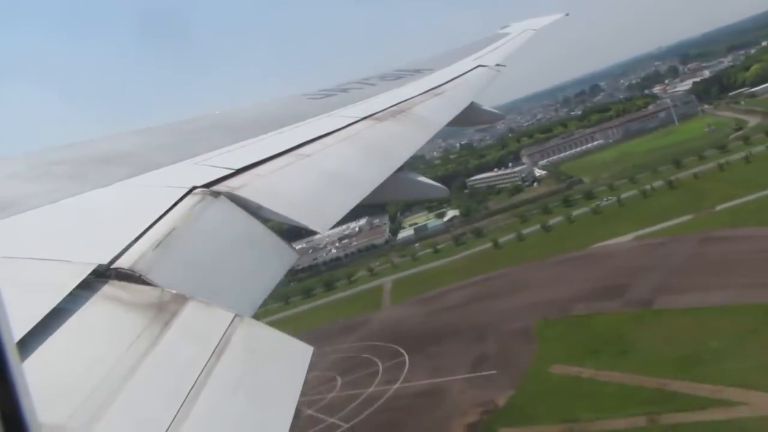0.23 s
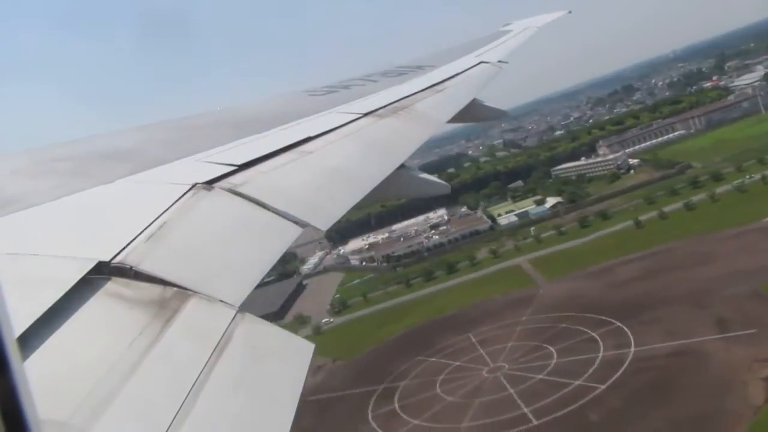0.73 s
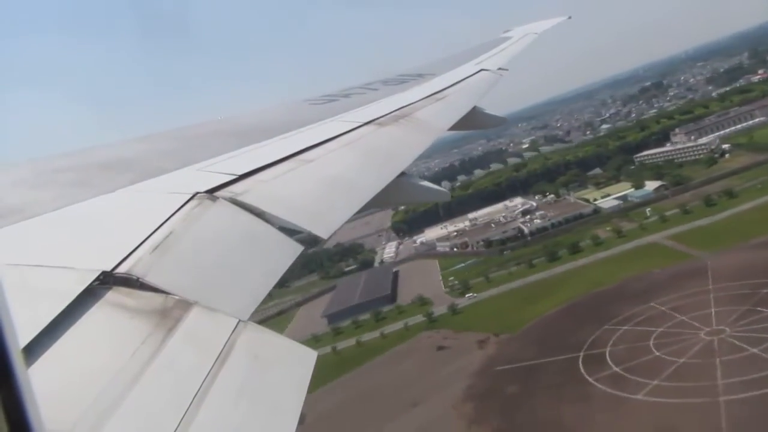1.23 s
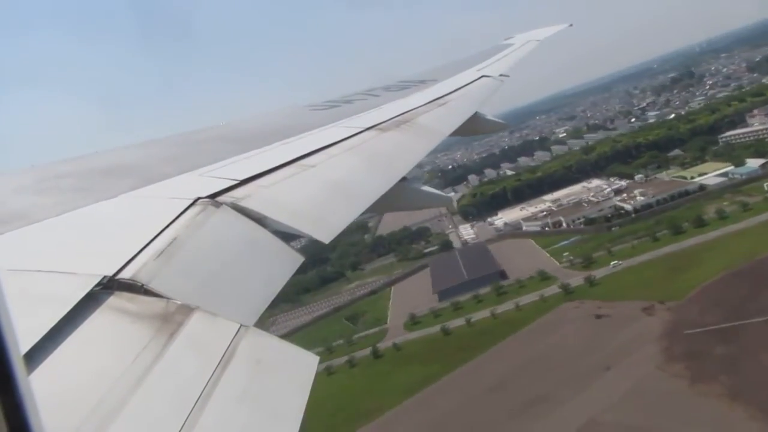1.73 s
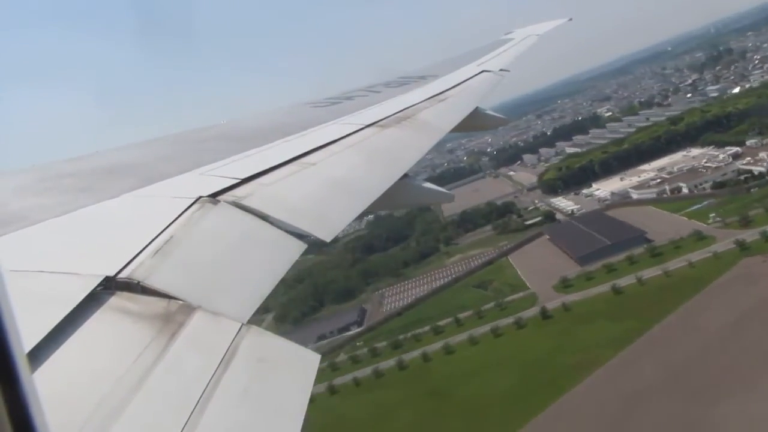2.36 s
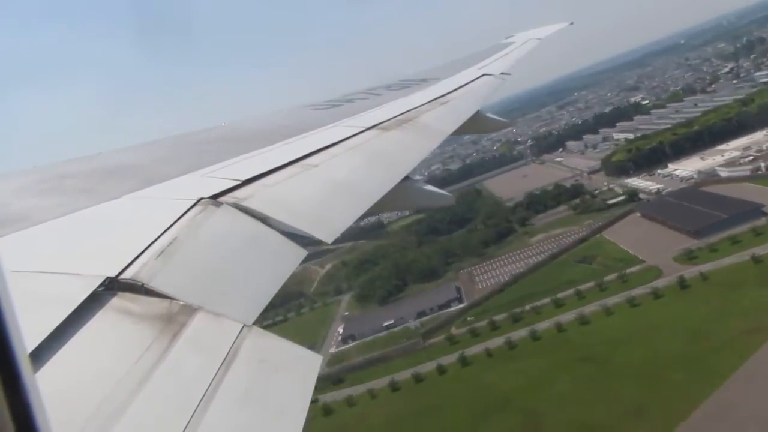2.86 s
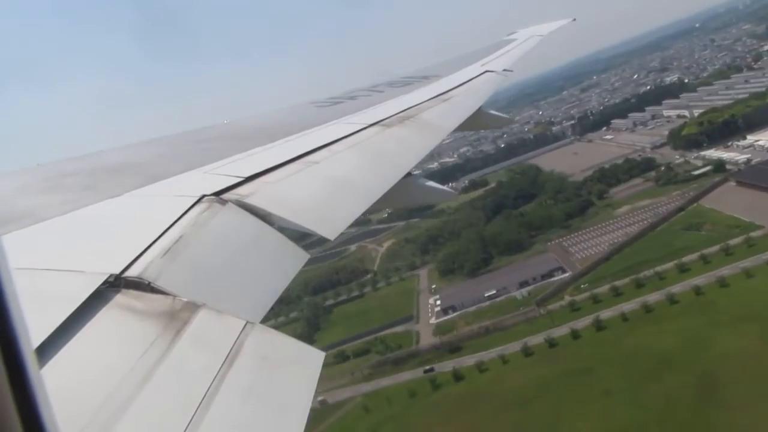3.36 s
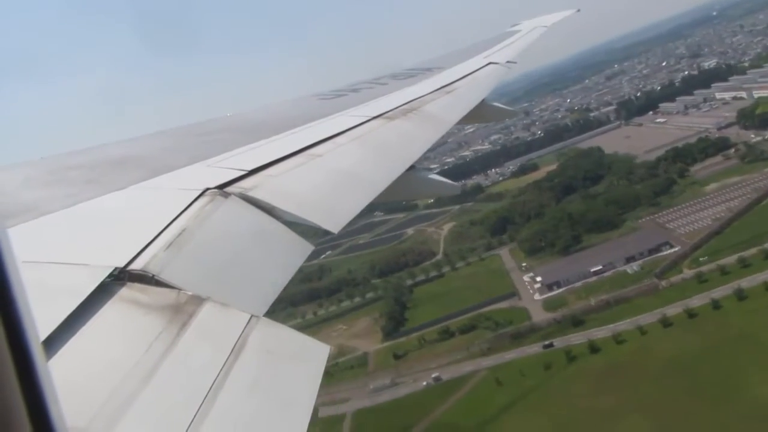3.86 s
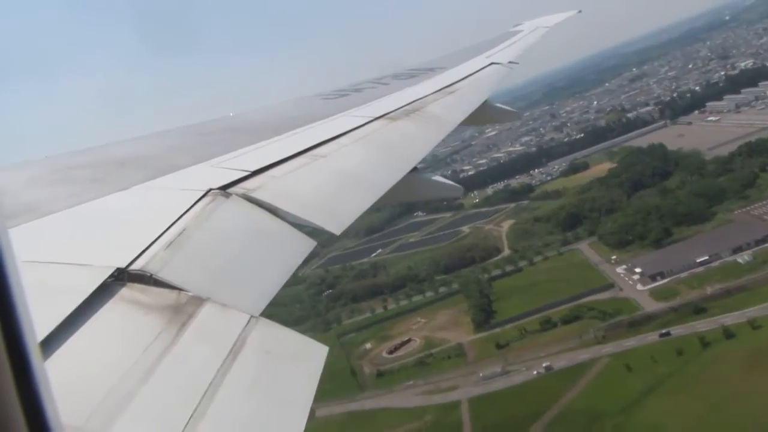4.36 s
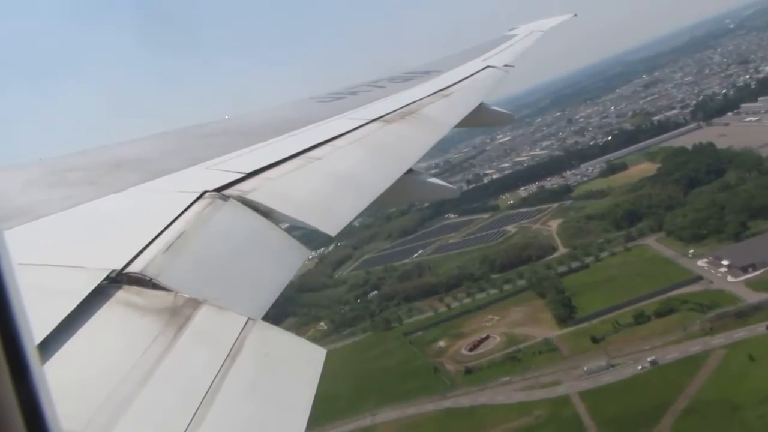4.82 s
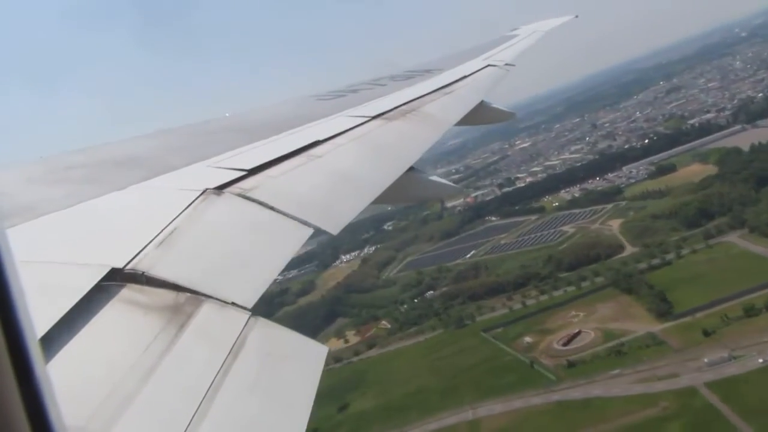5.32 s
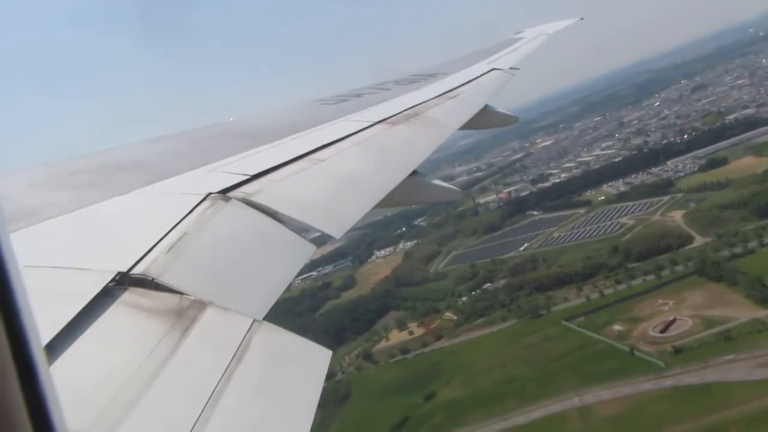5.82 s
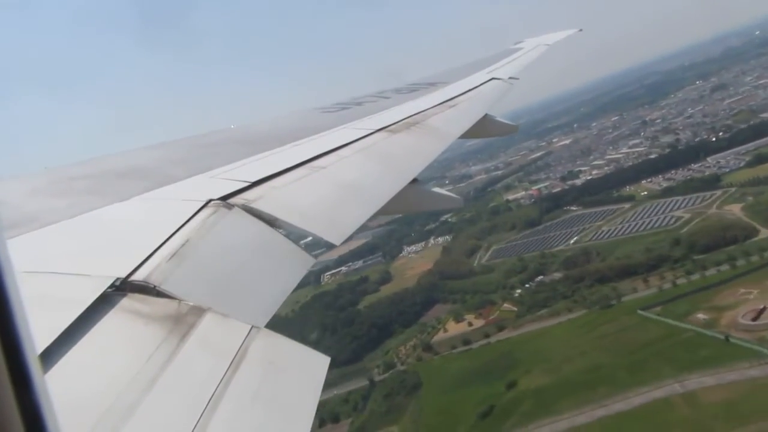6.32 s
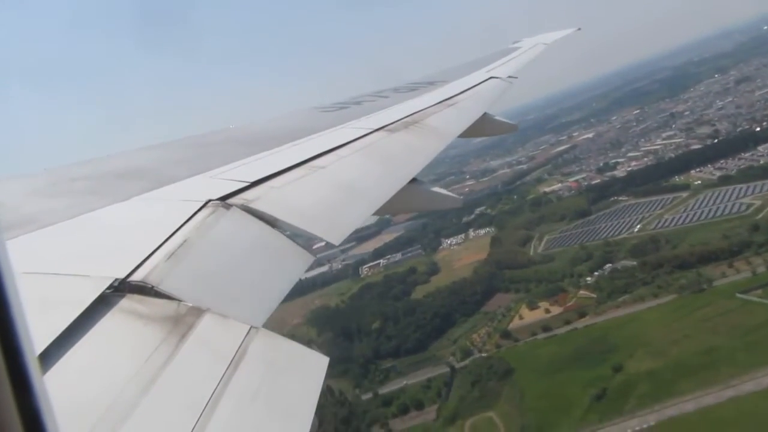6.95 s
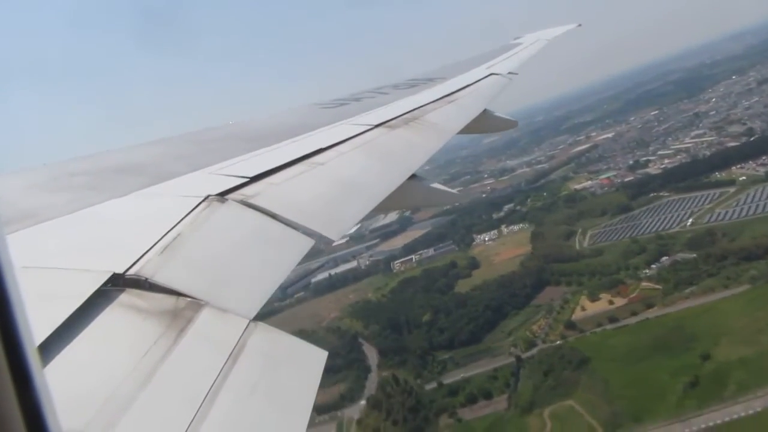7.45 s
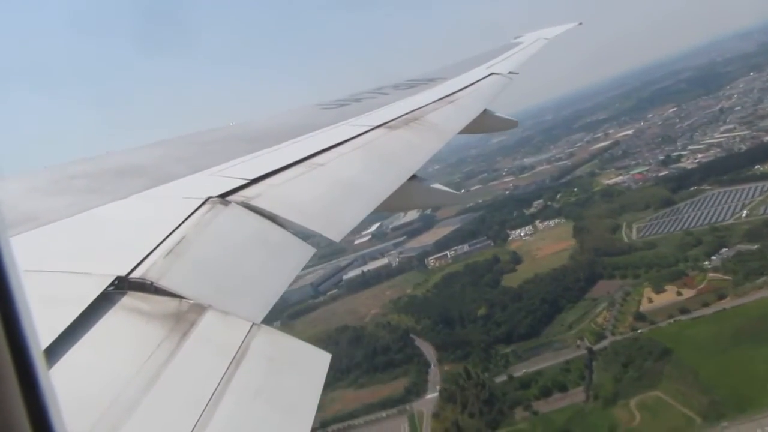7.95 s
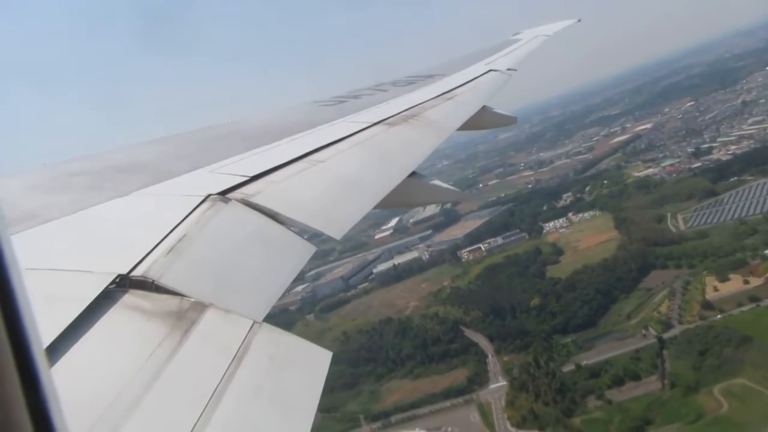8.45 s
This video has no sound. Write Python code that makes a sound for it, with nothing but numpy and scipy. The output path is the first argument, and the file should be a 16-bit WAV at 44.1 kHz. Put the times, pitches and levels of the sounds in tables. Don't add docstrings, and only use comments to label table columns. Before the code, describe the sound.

A continuous deep jet roar comes through the cabin wall, boomy and dull, with a weak mid-pitched engine tone drifting above it and soft vent hiss. Nearby, brittle plastic chatter bursts out again and again, rapid dry clicks in short flurries with lone ticks between, thinning later. Recorded very close to the window panel, in stereo, top end slightly dulled, with no fade or ending.

```python
import sys
import numpy as np
from scipy import signal
from scipy.fft import rfft, irfft
from scipy.io import wavfile

SR = 44100
rng = np.random.default_rng(int(sys.argv[2]) if len(sys.argv) > 2 else 0)


def put_to_file(sound):
    columns = np.atleast_2d(sound).T
    safe = np.clip(columns, -1, 1)
    whole_steps = np.round(safe * 32767)
    wavfile.write(sys.argv[1], SR, whole_steps.astype(np.int16))


def undo_db(level):
    steps = np.asarray(level, float) / 20
    return 10 ** steps


N = 382788
HZ = np.fft.rfftfreq(N, 1 / SR)

# f/Hz, density/dB per Hz
RUMBLE_SPECTRUM = [(20, -38.5), (40, -24), (58, -10.5), (70, -10), (85, -3.5), (100, 0.5), (118, -0.5),
                   (135, -3.5), (185, -2), (260, -15), (345, -17), (430, -29.5), (550, -48.5), (920, -120)]
ROAR_SPECTRUM = [(140, -26.5), (240, -2), (345, -5.5), (456, -13), (596, -18), (762, -21), (836, -22),
                 (897, -20.5), (962, -25.5), (1070, -27), (1210, -27), (2200, -39), (2530, -40),
                 (3900, -61.5), (5070, -91), (8580, -120)]
VENT_SPECTRUM = [(3000, -30), (3800, -11), (4300, -4), (4950, 1), (5400, -.5), (6600, 1.5), (7600, -1.5),
                 (9200, -5), (10100, -11), (12000, -15), (13500, -18), (14300, -18), (15200, -22),
                 (16000, -30)]
# f/Hz, width/Hz, lift/dB
WALL_MODES = [(757, 70, 6), (1050, 99, 6), (2080, 25, 0), (2320, 55, -1.5), (2500, 44, 2), (3035, 37, 7)]
# f/Hz, left minus right/dB
STEREO_LEAN = [(25, 1.5), (60, 0), (100, -1), (180, -2.5), (320, -2.1), (550, -1), (960, -.5), (1680, 0),
               (2920, -1.3), (5090, -.3), (8870, 0)]
# f/Hz, likeness/0-1, left lead/rad
PORTS = [(25, .99, .3), (60, .985, .25), (125, .97, .15), (250, .94, .1), (500, .86, .15), (800, .8, .2),
         (1300, .72, .9), (2070, .72, -.2), (2600, .75, .3), (3700, .85, 0), (4500, .3, .5), (9000, .1, 0)]
# f/Hz, width/Hz, level/dB rms, left minus right/dB
FAN_TONES = [(911, 3.5, -54, 0), (1710, 8, -71, 0), (1822, 6, -73, 0), (2504, 18, -72, 0),
             (2537, 14, -73, 0)]
# t/s, f/Hz, level/dB rms
SHAFT_TONE = [(0, 638.5, -50.5), (.75, 646, -44), (1.25, 642, -51), (1.7, 641, -49), (2.2, 635.5, -59),
              (2.9, 638, -49.5), (3.7, 651.6, -55.5), (4.5, 650, -52), (5.6, 647, -53), (6.4, 648, -46),
              (6.9, 642, -54), (8, 646, -47), (8.68, 654, -50)]
# t/s, roar level/dB
LOUDNESS = [(0.0, -32), (1.04, -31), (1.21, -28.5), (1.91, -29), (2.0, -30.5), (2.84, -26.5), (3.3, -28.5),
            (4.27, -28.5), (4.77, -29), (5.14, -28.5), (5.16, -31.5), (6.0, -29.5), (6.8, -29), (6.82, -31),
            (7.07, -30), (8.66, -28.5)]
# t/s, change/dB, length/s
BUFFETS = [(.2, -1, 0.028), (0.547, 0, 0.052), (0.744, -0.5, 0.013), (1.337, 0.5, 0.043),
           (1.53, 2.5, 0.032), (2.092, 10, 0.01), (2.146, -6, 0.025), (3.67, -4.5, 0.023),
           (4.554, 1.5, 0.25), (4.596, -12, 0.016), (5.055, 2, 0.38), (5.503, -3.5, 0.052),
           (5.682, -3.5, 0.037), (6.397, 1.5, 0.069), (7.66, -10.5, 0.032), (8.094, 0, 0.16),
           (8.473, 3, .04)]
# t/s, change/dB, length/s
KNOCKS = [
    (1.232, 2.5, 0.01),
    (3.098, -3.5, 0.005),
    (4.89, 2.5, 0.013),
    (6.26, 2, 0.0086),
]
# f/Hz, t60/s, left level/dB, right level/dB
PART_MODES = [(2070, 0.036, -25.5, -25), (2444, 0.04, -25.5, -23), (2596, 0.012, -17.5, -19),
              (2850, 0.038, -28, -23.5), (4350, 0.0032, -8, -10.5), (5130, 0.0028, -6, -7),
              (6240, .002, -7, -12), (6440, 0.0035, -13.5, -14.5), (7200, 0.002, 6, -5),
              (7990, 0.0026, 2, -11.5), (8900, 0.0017, -12.5, -5.5), (10200, 0.0013, -10.5, -17),
              (11100, 0.002, -11.5, -19), (12100, 0.00092, -9, -19.5), (14000, .0015, -17, -16)]
# t of hardest blow/s, peak/dB, swings before, swings after
RUNS = [(0.6987, -27, 0, 4), (0.7962, -28, 4, 1), (1.0356, -31, 2, 6), (1.2035, -31, 0, 8),
        (1.5337, -24, 2, 3), (1.6003, -30, 0, 4), (1.7568, -24, 3, 2), (1.9256, -28, 0, 5),
        (2.0021, -27, 0, 6), (2.4567, -25, 9, 12), (2.6399, -29, 3, 4), (2.9224, -28, 5, 2),
        (3.2926, -27, 7, 4), (3.5217, -28, 0, 4), (3.6165, -33, 4, 0), (3.7076, -27, 0, 10),
        (3.8849, -30, 5, 0), (4.0948, -32, 4, 0), (4.1469, -27, 2, 6), (4.3837, -33, 0, 4),
        (4.4719, -30, 0, 10), (4.9183, -31, 7, 0), (5.0038, -32, 6, 0), (5.1612, -28, 4, 1),
        (5.4056, -28, 0, 6), (5.5134, -35, 2, 3), (5.6395, -29, 7, 1), (5.7693, -28, 2, 3),
        (6.8408, -32, 3, 4), (7.108, -30, 6, 6)]
BURSTS = [(0.0446, -30, 0, 1), (0.603, -27, 2, 0), (1.3583, -27, 1, 0), (1.4668, -31, 1, 1),
          (1.6768, -28, 0, 3), (2.0892, -28, 1, 1), (2.8152, -28, 0, 3), (3.4608, -28, 2, 0),
          (4.2437, -26, 1, 0), (4.2718, -27, 0, 0), (4.8156, -27, 1, 2), (5.0349, -28, 0, 2),
          (5.3587, -27, 0, 1), (5.8696, -26, 2, 2), (6.0851, -28, 2, 1), (6.1477, -28, 2, 1),
          (6.408, -27, 0, 0), (6.4357, -31, 0, 4), (6.6965, -28, 0, 0), (6.9915, -29, 3, 0),
          (7.5571, -30, 2, 0), (7.7167, -26, 1, 1), (7.9305, -28, 0, 4), (8.0191, -27, 0, 1),
          (8.086, -26, 1, 0), (8.3319, -31, 3, 0), (8.3763, -31, 2, 0), (8.4597, -26, 1, 2),
          (8.5861, -25, 0, 1), (8.6468, -28, 2, 0)]
# t/s, peak/dB
LONE_BLOWS = [(.0027, -34), (.3049, -33), (.3518, -35), (.4552, -35), (.5488, -33), (.6654, -34),
              (.8969, -35), (.9396, -34), (.9832, -37), (1.1734, -33), (1.3947, -34), (1.8419, -33),
              (1.8952, -35), (2.3001, -30), (2.3502, -33), (2.7752, -31), (3.1253, -35), (3.3644, -32),
              (3.9804, -32), (4.6366, -32), (5.2462, -35), (5.9477, -33), (6.2058, -31), (6.5509, -35),
              (6.7866, -31), (7.255, -32), (7.4745, -32), (8.12, -30), (8.417, -32), (8.5398, -31)]
HARD_BLOWS = [(1.5487, -29), (1.5646, -27), (1.7305, -30), (1.7396, -25), (1.7478, -29), (1.7647, -29),
              (2.0988, -31), (2.4654, -31), (2.4844, -30), (2.5026, -31), (2.5366, -26), (2.5453, -26),
              (2.8331, -28), (2.8418, -30), (2.8961, -30), (2.9316, -28), (3.2277, -30), (3.2633, -31),
              (3.3199, -31), (3.7581, -30), (3.8491, -30), (4.1298, -27), (4.1665, -28), (4.2004, -30),
              (5.4248, -30), (5.6486, -30), (5.7499, -29), (5.8508, -29), (6.139, -30), (8.0761, -27)]

RUMBLE_DB, ROAR_DB = 14.5, 2
VENT_DB, VENT_FOLLOW = -62, 1
SHAFT_DRIFT_HZ, SHAFT_FADE_DB, WANDER_HZ = 1.2, 1.2, 1.6
PANEL_HZ, PANEL_LEAD_S, PANEL_SPAN_S = 112, .0002, .011
PANEL_DB, PANEL_SLOPE = -22.5, 0.48
HIT_SHARE, SWING_JITTER = .72, .09
LIGHT_DB = (-41, -31)
STRAYS, STRAY_DB = 26, (-42, -36)
TICK_DB, CONTACT_S, RIGHT_LAG_S = -7.5, .00005, .00005
REBOUND_S, REBOUND_DB, REBOUND_DULL_HZ = .000385, 1.0, 8500
VARY_DB, VARY_HZ_SHARE, VARY_REBOUND_S = 1.4, .01, .000015
HARD_TILT = .12
SCATTER_DB, SCATTER_T60_S, SCATTER_LAG_S = (-21.5, -15), .02, 0.00054
FRESH_SHARE = 1.0
MIC_TOP_HZ = 14200


def on_hz(table):
    f, v = np.transpose(table)
    return np.interp(np.log(HZ + 1), np.log(f + 1), v)


def curve(table):
    s, *columns = np.transpose(table)
    return [np.interp(np.arange(N) / SR, s, c) for c in columns]


def bumps(table):
    t = np.arange(N) / SR
    return sum(db * np.exp(-((t - s) / length) ** 2) for s, db, length in table)


def walk(rate_hz):
    slow = irfft(rfft(rng.standard_normal(N)) * np.exp(-(HZ / rate_hz) ** 2), N)
    return (slow - slow.mean()) / slow.std()


def level(x, db):
    return x * undo_db(db) / np.sqrt(np.mean(x ** 2))


def field(gain):
    hz, like, lead_rad = np.transpose(PORTS)
    like = np.clip(on_hz(np.c_[hz, like]), 0, 1)
    mid, side = rfft(rng.standard_normal((2, N)))
    pair = np.sqrt(1 + like) * mid + np.sqrt(1 - like) * side * np.array([[1], [-1]])
    lean = undo_db(on_hz(STEREO_LEAN) / 2) * np.exp(.5j * on_hz(np.c_[hz, lead_rad]))
    return level(irfft(gain * pair * np.array([lean, 1 / lean]), N), 0)


def vents(ride_db):
    return field(undo_db(on_hz(VENT_SPECTRUM))) * undo_db(VENT_DB + VENT_FOLLOW * ride_db)


def rumble(loud_db):
    return field(undo_db(on_hz(RUMBLE_SPECTRUM))) * undo_db(loud_db + RUMBLE_DB + bumps(BUFFETS))


def roar(loud_db):
    lift_db = sum(db / (1 + (2 * (HZ - hz) / width) ** 2) for hz, width, db in WALL_MODES)
    noise = field(undo_db(on_hz(ROAR_SPECTRUM) + lift_db))
    return noise * undo_db(loud_db + ROAR_DB + bumps(KNOCKS))


def fan_tones():
    out = 0
    for hz, width, db, pan_db in FAN_TONES:
        line = irfft(rfft(rng.standard_normal(N)) * np.exp(-((HZ - hz) / width) ** 2), N)
        out = out + level(line, db) * undo_db(np.array([[pan_db], [-pan_db]]) / 2)
    return out


def shaft():
    hz, db = curve(SHAFT_TONE)
    hz = hz + SHAFT_DRIFT_HZ * walk(WANDER_HZ)
    db = db + SHAFT_FADE_DB * walk(WANDER_HZ)
    return np.sqrt(2) * undo_db(db) * np.sin(2 * np.pi * np.cumsum(hz) / SR)


def strikes():
    hits = list(LONE_BLOWS) + list(HARD_BLOWS)
    hard_s = np.array(HARD_BLOWS)[:, 0]
    for s, peak_db, before, after in list(RUNS) + list(BURSTS):
        hits.append((s, peak_db))
        for way, swings in ((-1, int(before)), (0.99, int(after))):
            at = s + way * np.cumsum(1 + SWING_JITTER * rng.standard_normal(swings)) / PANEL_HZ
            lands, weak = rng.random((swings, 2)).T
            free = np.abs(at[:, None] - hard_s).min(1) > .5 / PANEL_HZ
            struck = free & ((lands < HIT_SHARE) | (np.arange(swings) == swings - 1))
            top_db = min(peak_db, LIGHT_DB[1])
            light_db = LIGHT_DB[0] + weak[struck] * (top_db - LIGHT_DB[0])
            hits += list(zip(at[struck], light_db))
    when, size = rng.random((STRAYS, 2)).T
    stray_db = STRAY_DB[0] + size * (STRAY_DB[1] - STRAY_DB[0])
    hits += list(zip(when * (N - 2) / SR, stray_db))
    return np.array(hits)


def blows(hits, size):
    at = hits[:, 0] * SR
    whole = at.astype(int)
    early = np.bincount(whole, size * (1 - at + whole), N)
    late = np.bincount(whole + 1, size * (at - whole), N)
    return rfft((early + late)[:N])


def panel(hits):
    t = (np.arange(N) + N // 2) % N - N // 2
    t = t / SR + PANEL_LEAD_S
    swing = -np.cos(2 * np.pi * PANEL_HZ * t) * np.exp(-((t + PANEL_SPAN_S / 2) / PANEL_SPAN_S) ** 2)
    peak_db = hits[:, 1]
    size = undo_db(PANEL_DB + PANEL_SLOPE * (peak_db - peak_db.mean()))
    return irfft(rfft(swing) * blows(hits, size), N)


def rattle(hits):
    size = 2048
    t, f = np.arange(size // 2) / SR, np.fft.rfftfreq(size, 1 / SR)
    at, peak_db = hits.T
    hz, t60, *ear_db = np.transpose(PART_MODES)
    luck = rng.standard_normal((len(at), 2 * len(hz) + 1))

    tilt_db = HARD_TILT * np.outer(peak_db - peak_db.mean(), np.maximum(hz / 1000 - 7.5, 0))
    mode_db = VARY_DB * luck[:, :len(hz)] + tilt_db
    mode_hz = hz * (1 + VARY_HZ_SHARE * luck[:, len(hz):-1])
    modes = np.sin(2 * np.pi * mode_hz[..., None] * t) * np.exp(-np.log(1000) * t / t60[:, None])
    modes = modes * (1 - np.exp(-t / CONTACT_S))
    ring = rfft(np.einsum("cm,em,emt->ect", undo_db(np.array(ear_db)), undo_db(mode_db), modes), size)

    rebound_s = REBOUND_S + VARY_REBOUND_S * luck[:, -1, None, None]
    rebound_gain = undo_db(REBOUND_DB) / (1 + (f / REBOUND_DULL_HZ) ** 4)
    ring = ring * (1 + rebound_gain * np.exp(-2j * np.pi * f * rebound_s))

    paths = rng.standard_normal((2, len(t))) + FRESH_SHARE * rng.standard_normal((len(at), 2, len(t)))
    echoes = paths * np.exp(-np.log(1000) * t / SCATTER_T60_S) * (t > SCATTER_LAG_S)
    scatter_gain = undo_db(np.array(SCATTER_DB))[:, None] / 2
    scattered = ring.mean(1, keepdims=True) * rfft(echoes, size) * scatter_gain
    direct = ring * np.exp(-2j * np.pi * f * np.array([[0], [RIGHT_LAG_S]]))
    ticks = irfft(direct + scattered, size)

    onset_rms = np.sqrt((ticks[:, :1, :44] ** 2).mean(2, keepdims=True))  # left, first 1 ms
    ticks = ticks / onset_rms * undo_db(peak_db + TICK_DB)[:, None, None]
    out = np.zeros((2, N + size))
    for start, tick in zip((at * SR).astype(int), ticks):
        out[:, start:start + size] += tick
    return out[:, :N]


def scene():
    loud_db, = curve(LOUDNESS)
    ride_db = loud_db - loud_db.mean()
    engines = rumble(loud_db) + roar(loud_db)
    whine = fan_tones() * undo_db(ride_db) + shaft()
    hits = strikes()
    return vents(ride_db) + engines + whine + panel(hits) + rattle(hits)


def low_pass(x):
    return signal.sosfilt(signal.butter(12, 15800, fs=SR, output="sos"), x)


def record(dry):
    heard = signal.sosfilt(signal.butter(12, MIC_TOP_HZ, fs=SR, output="sos"), dry)
    rounded = np.tanh(1.242 * heard) / 1.212
    return low_pass(rounded)


dry = scene()
out = record(dry)
put_to_file(out)
```